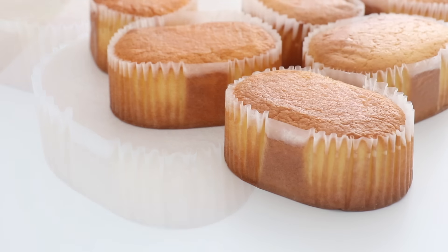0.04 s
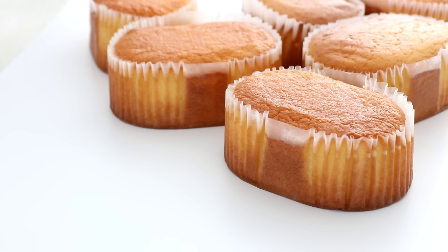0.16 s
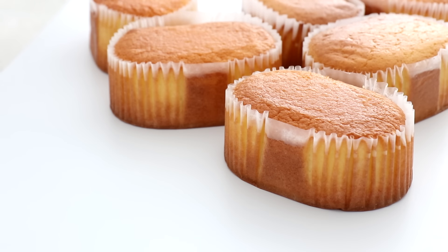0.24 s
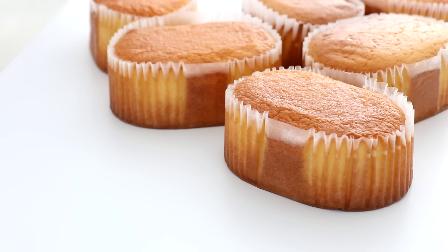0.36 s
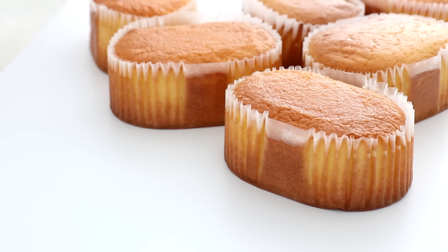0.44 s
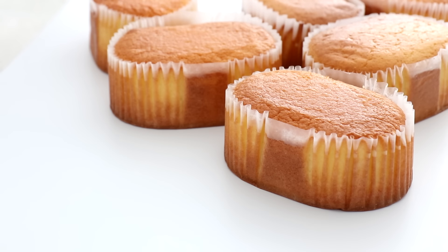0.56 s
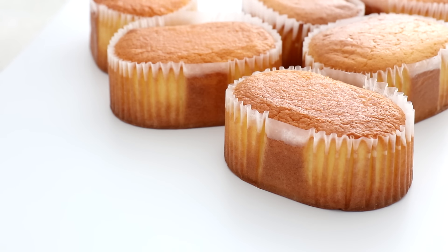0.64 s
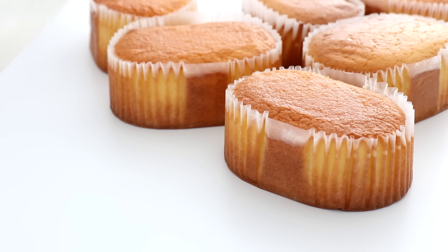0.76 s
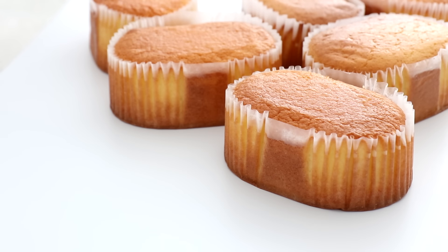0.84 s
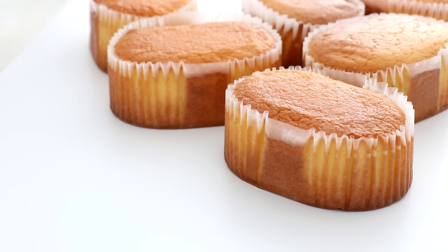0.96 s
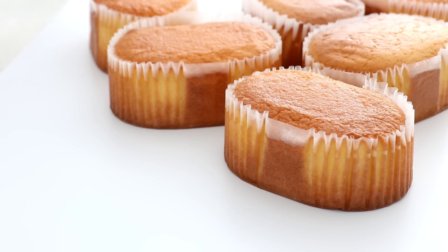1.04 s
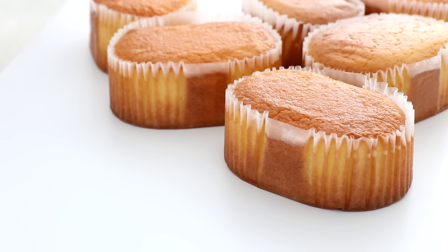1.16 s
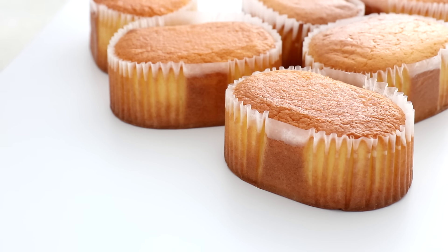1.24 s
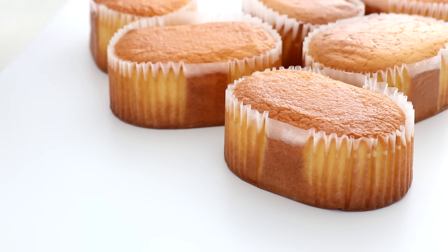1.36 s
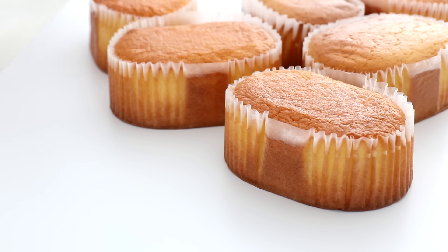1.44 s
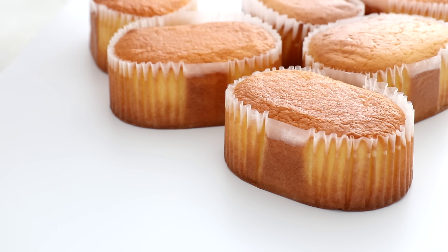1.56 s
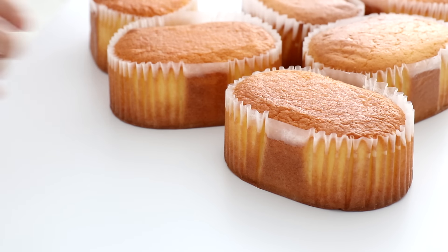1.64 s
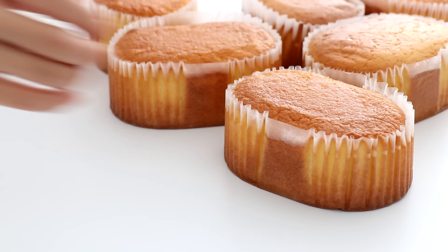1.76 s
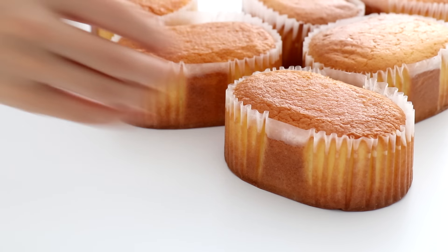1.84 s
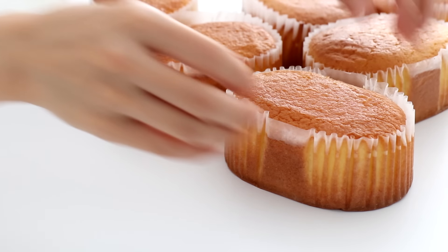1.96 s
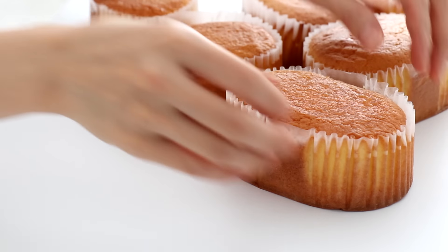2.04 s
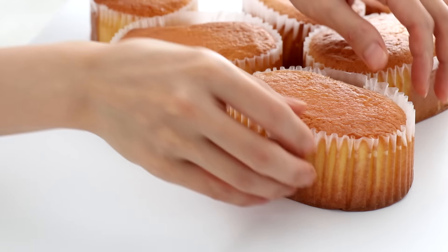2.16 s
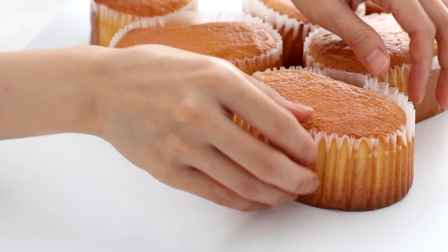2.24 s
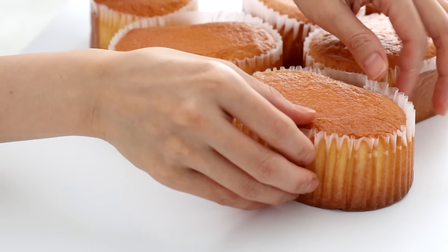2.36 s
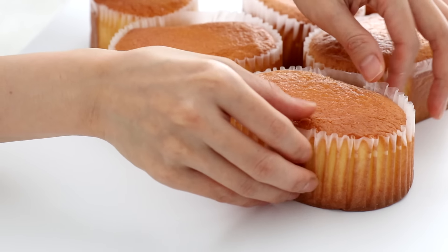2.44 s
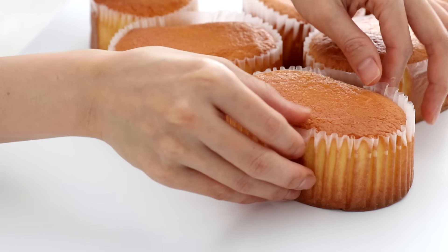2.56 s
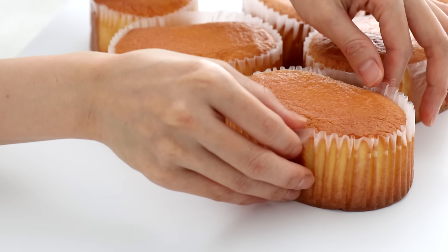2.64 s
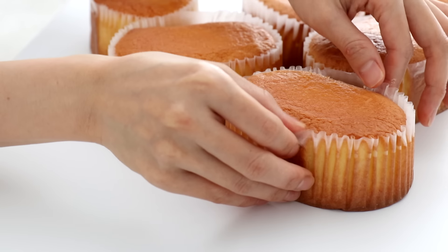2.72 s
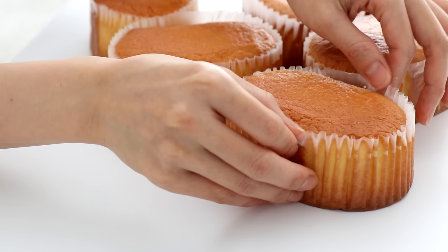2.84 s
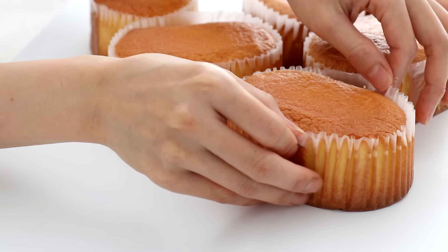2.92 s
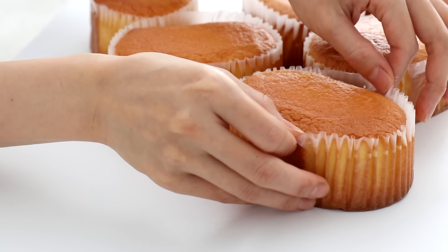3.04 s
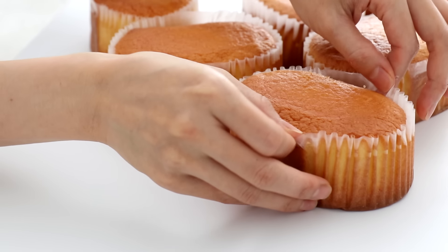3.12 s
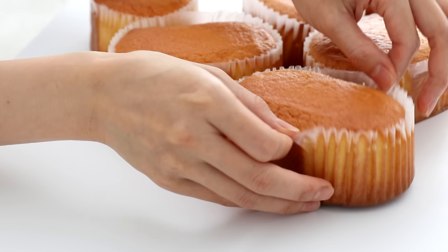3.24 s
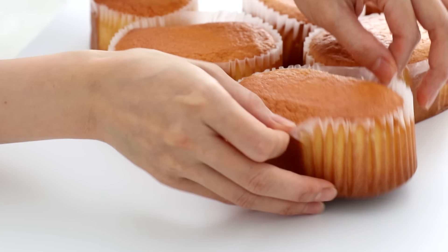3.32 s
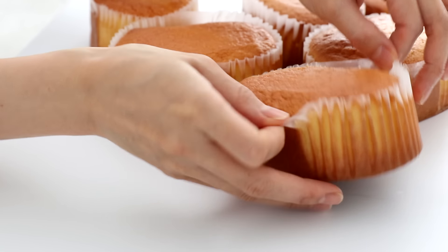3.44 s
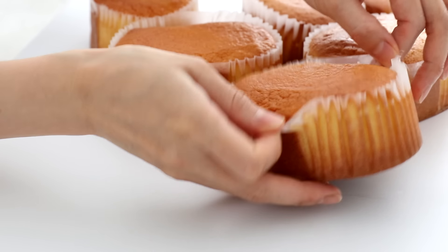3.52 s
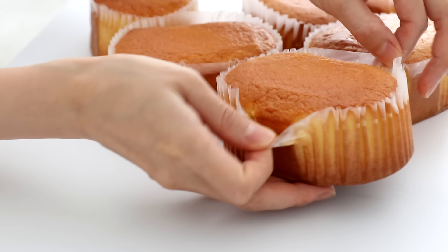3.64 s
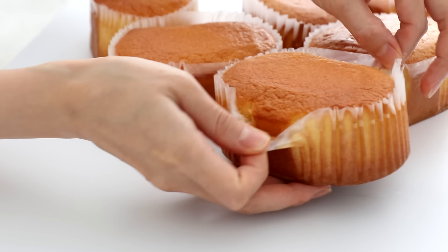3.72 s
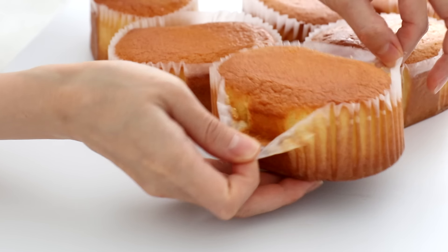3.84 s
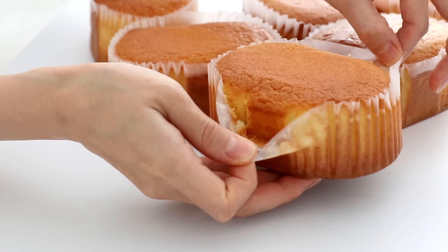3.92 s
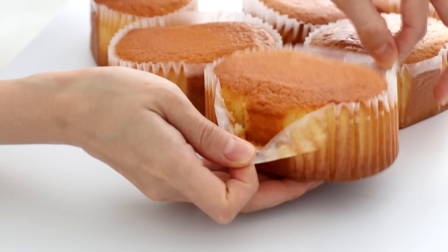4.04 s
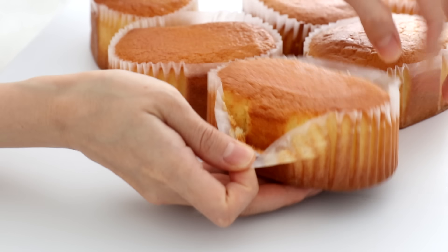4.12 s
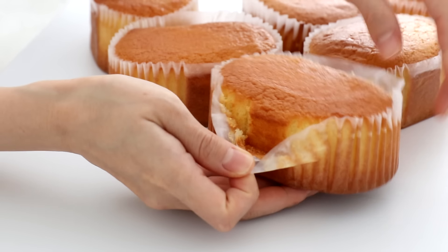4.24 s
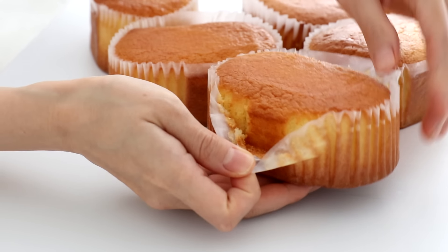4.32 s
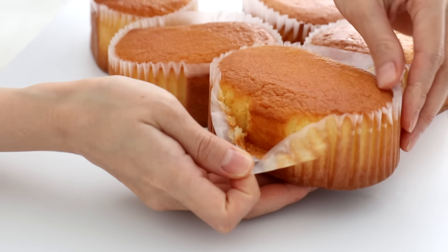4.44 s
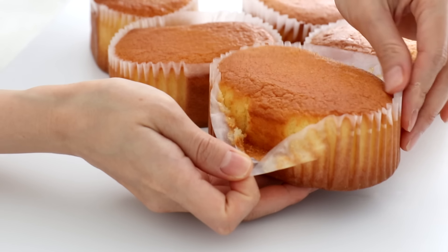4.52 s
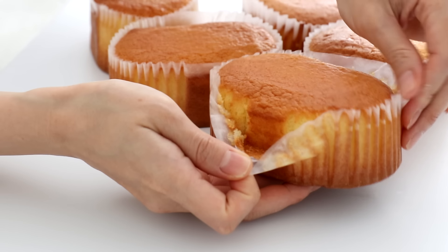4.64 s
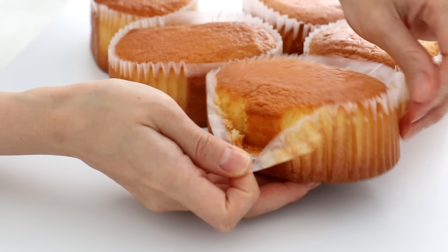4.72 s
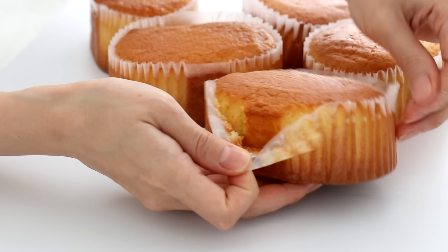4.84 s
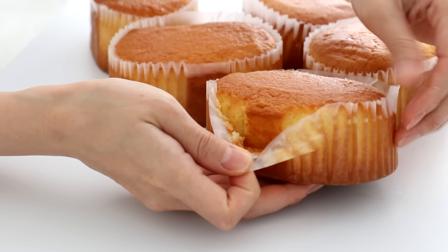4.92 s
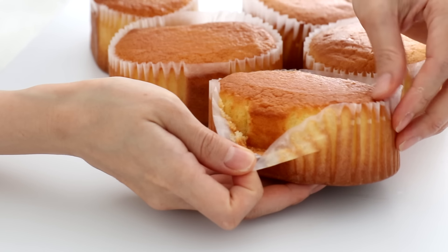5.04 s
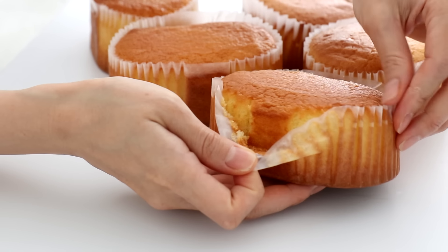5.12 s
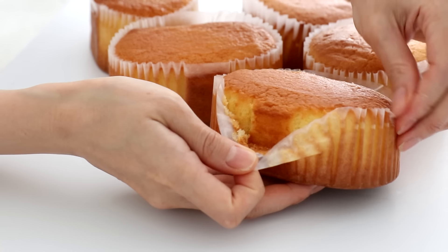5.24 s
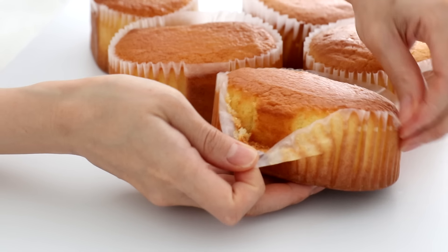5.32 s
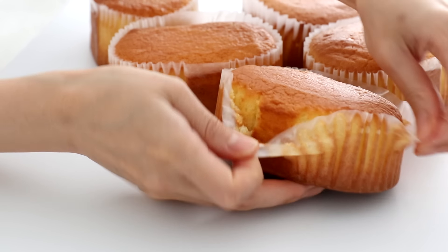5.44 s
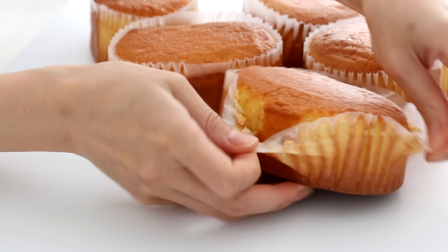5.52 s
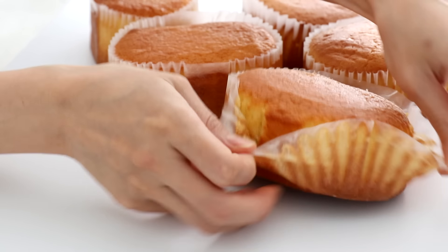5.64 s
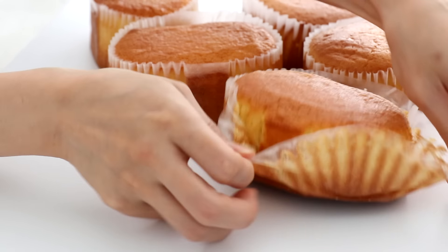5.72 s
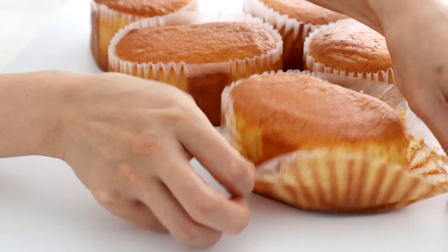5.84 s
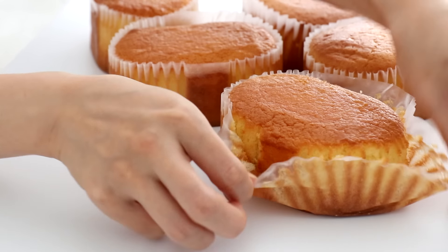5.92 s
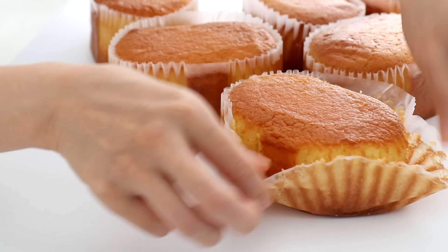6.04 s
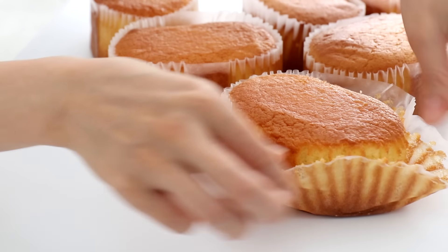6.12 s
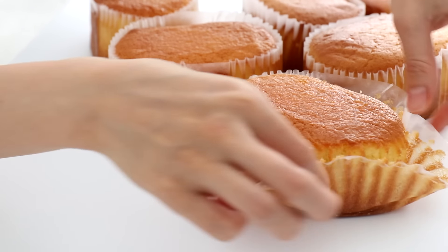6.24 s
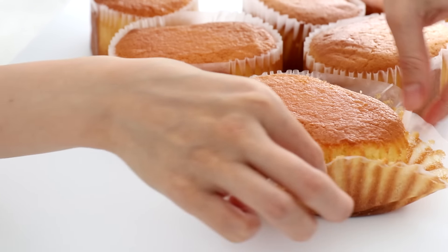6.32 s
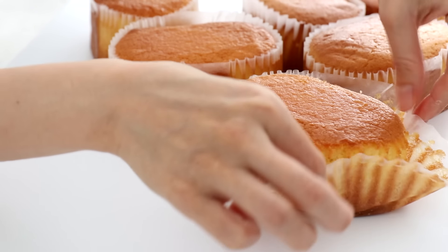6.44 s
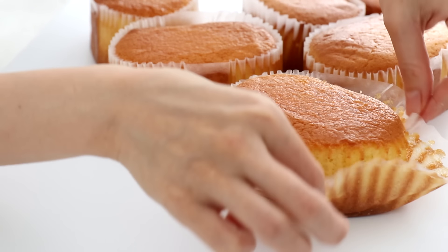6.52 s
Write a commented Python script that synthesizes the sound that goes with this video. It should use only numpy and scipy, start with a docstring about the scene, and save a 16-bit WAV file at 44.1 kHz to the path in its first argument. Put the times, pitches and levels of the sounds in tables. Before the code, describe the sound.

In a quiet room, thin baking paper crinkles and rips away from soft cake in dry, crisp bursts, with a soft early bump and low appliance hum.

```python
"""Peeling a paper liner off a small cake

Two hands peel a pleated paper liner off a small cake on a table, close to the microphone in a quiet room.
Pleats buckle with dry snaps (struck, ringing facets); short pulls tear paper from crumb with a fine
crackle (many tiny clicks), among short pitched rubs and lingering rings (brief runs of ringing clicks).
The cake bumps softly on the table (fading low tones). An appliance hums with a slow beat and rushes
(tones and resonant noise) over the room's air (coloured noise)."""
import sys
import numpy as np
from scipy import signal
from scipy.io import wavfile

SR = 44100
rng = np.random.default_rng(int(sys.argv[2]) if len(sys.argv) > 2 else 0)


def put_to_file(sound):
    """Save the sound as 16-bit audio at rate SR, in the file named by the first command-line argument."""
    columns = np.atleast_2d(sound).T  # one column per channel
    safe = np.clip(columns, -1, 1)
    whole_steps = np.round(safe * 32767)
    wavfile.write(sys.argv[1], SR, whole_steps.astype(np.int16))


N = 290178
TIME = np.arange(N) / SR   # seconds

# Hum before its overall gain and waver: [t/s, level/dB]
HUM_LEVEL = [(0.0, -53.5), (1.5, -55.5), (2.1, -65), (3.3, -55), (4.1, -55.5), (4.8, -52), (6.58, -52)]
# Shaft tone, an octave below the hum, before its waver: [t/s, level/dB]
SHAFT_LEVEL = [(0.0, -54), (0.4, -78), (0.88, -49), (1.6, -53.5), (2.6, -56.5), (3.1, -66), (4.0, -66),
               (4.58, -48.5), (4.9, -67), (6.35, -52.5), (6.58, -55)]
# Resonances in the appliance's rush: [f/Hz, width/Hz, level/dB, left over right/dB]
RUSH_RESONANCES = [(193.7, 20.3, -58, -2), (313.2, 25, -63, -4), (539, 86, -68, -2),
                   (723, 16.6, -68.5, -10), (1352, 122, -63, -11), (2648, 27, -83.5, 5)]
HUM_HZ = 115.75
# The hum beats: period, time of one dip, size of the second tone beside the first
BEAT_S, BEAT_DIP_S, BEAT_SHARE = 1.653, 0.62, 0.35

# Colour of the room air, relative: [f/Hz, level per Hz/dB]
AIR_COLOUR = [(20, -21), (32, -3.5), (47, 3.5), (80, -2.5), (150, -7), (200, -1.5), (260, -7), (370, -8.5),
              (455, -20.5), (600, -18.5), (1100, -19.5), (1450, -24), (1800, -28.5), (4500, -34.5),
              (15500, -40.5)]
# How alike left and right are in the room air and the rush: [f/Hz, correlation]
CHANNEL_LIKENESS = [(30, 1), (60, 0), (110, 0.35), (210, 0.74), (380, 0.38), (700, 0.089), (1400, 0.051),
                    (2600, 0.44), (15000, 0)]

# Ranges in which paper sounds: whole pleats (body), facets (crack), fibres (tick): [low f/Hz, high f/Hz]
PAPER_RANGES = [(650, 2510), (2500, 6300), (7800, 14900)]
# Relative colour of the crackle within those ranges: [f/Hz, level/dB]
CRACKLE_COLOUR = [(500, -6), (900, -1), (1400, -0.5), (2000, 1.5), (2600, -8), (3600, -0.5), (5000, -2),
                  (6800, -13), (9500, 0), (12500, -14), (16000, 9)]
# Pulls and rubs of the fingers, before the range colour below:
# [t/s at full strength, hold/s, level/dB in the crack range, brightness/dB per range upwards]
PULLS = [(2.372, 0.012, -53, -6), (2.475, .032, -54, 1), (2.681, 0.029, -54.5, -4),
         (2.809, 0.049, -63.5, -2.5), (2.893, 0.067, -64, 3), (3.076, 0.08, -72.5, 6),
         (3.253, .012, -71, -1), (3.332, 0.027, -71, -5), (3.405, 0.27, -65, -0.5),
         (3.64, 0.069, -54, -1.5), (3.717, .045, -52.5, 0), (3.833, 0.091, -57, -3),
         (3.929, 0.011, -49, -1), (4.005, 0.016, -52.5, 3), (4.135, .02, -48.5, 3.5), (4.61, 0.064, -69, 5),
         (4.688, 0.056, -50.5, 5.5), (4.785, 0.0097, -47, 3), (4.947, 0.031, -71, 9),
         (5.178, 0.028, -58, 8), (5.302, 0.025, -55.5, 3.5), (5.506, 0.1, -57.5, 0.5),
         (5.622, 0.076, -54, -2.5), (5.719, 0.1, -62.5, -5), (5.766, .02, -57, -2),
         (5.794, 0.019, -47, 0.5), (5.939, 0.014, -56.5, -2.5), (6.012, 0.081, -61, -1.5),
         (6.157, .2, -70, -1), (6.319, 0.016, -61.5, 3.5), (6.392, 0.023, -47.5, 0.5),
         (6.538, 0.016, -53.5, 4)]
# Colour of a pull, one value for each of body, crack and tick: [level/dB]
PULL_COLOUR = [-1.5, -1, -4.5]
PULL_ATTACK_S, PULL_RELEASE_DB_PER_S = 0.0079, 253   # quick to take hold, then the paper settles
REACH_S, REACH_WIDTH_S, REACH_DB = 1.98, 0.21, -70.5   # faint swish as the hands reach in, before colour

# Pleats that buckle loudly:
# [t/s, facet ring f/Hz, level/dB in its own range, purity/dB lost per range away from the ring]
SNAPS = [(2.367, 1220, -35.5, 10), (2.38, 1500, -33.5, 1), (2.5501, 920, -44.5, 6),
         (2.6736, 11330, -41.5, 2), (2.6845, 4780, -41, 13), (2.7325, 11100, -44, 3),
         (2.7551, 3960, -47, 18), (2.815, 2030, -34.5, 6.5), (2.8792, 4740, -44, 2.5),
         (2.905, 10510, -44.5, 1.5), (3.0408, 1510, -48, 11), (3.0767, 8300, -49, 1),
         (3.2483, 10900, -49.5, 11), (3.3261, 10900, -41.5, 0.5), (3.407, 3300, -42.5, 12.5),
         (3.4768, 3010, -45.5, 21), (3.612, 4950, -46.5, 9), (3.621, 1650, -45, 13),
         (3.6387, 1557, -42, 18), (3.6506, 2110, -39, 10), (3.6615, 4600, -35.5, 3.5),
         (3.6665, 5040, -43, 5), (3.6796, 2750, -36.5, 23), (3.699, 3920, -41, 13), (3.7202, 3920, -33, 6),
         (3.7222, 11900, -31, 2.5), (3.7238, 3730, -35, 21), (3.7452, 2280, -37.5, 12),
         (3.762, 4570, -46, 13), (3.7833, 3580, -41.5, 18), (3.83, 4350, -40, 12), (3.8332, 3400, -41, 13),
         (3.8474, 1205, -44.5, 9), (3.8973, 4610, -45, 13), (3.9166, 5200, -36, 12), (3.9386, 4610, -38, 8),
         (3.947, 1500, -45, 11), (3.9703, 3830, -44, 4), (4.0, 3330, -31, 6.5), (4.1001, 1520, -42.5, 8),
         (4.1304, 4960, -39, 3.5), (4.681, 5050, -49, 14), (4.6932, 10840, -39, 3),
         (4.7192, 5130, -33.5, 14), (4.7253, 4150, -35, 2), (4.7854, 4740, -34.5, 9),
         (5.2155, 11200, -41.5, 3), (5.32, 2420, -51.5, -3), (5.3555, 11150, -45.5, 5),
         (5.4293, 11360, -45, 3.5), (5.4675, 890, -49, 18), (5.48, 11700, -42, 5), (5.4927, 1680, -46.5, 9),
         (5.5056, 13600, -36.5, 24), (5.5365, 2970, -48, 10), (5.63, 9420, -35.5, 5), (5.656, 3980, -46, 0),
         (5.7129, 9600, -39.5, 5), (5.7564, 11350, -36.5, 4.5), (5.796, 4970, -39, 9),
         (5.8115, 4230, -39, 15), (5.829, 4260, -40, 15), (6.0162, 5730, -51, 1), (6.0276, 5780, -53, -1),
         (6.085, 1900, -50, 5), (6.1648, 3300, -40.5, 6), (6.4052, 3380, -41, 3), (6.4942, 2080, -50, 8),
         (6.5049, 1850, -40, 9), (6.517, 1880, -42, 6), (6.5376, 1940, -33.5, 10)]
# Extra gain of body, crack and tick when the ring lies in another range: [gain/dB]
FLIP_COLOUR = [-8, -1.5, 3.5]
SNAP_PAN_DB, SNAP_SCATTER_DB = -0.8, 0.8   # left over right for the pleats, and its spread
# Lesser pleats in a pull: average gap, level above the pull, purity per range
SMALL_SNAP_GAP_S, SMALL_SNAP_OVER_DB, SMALL_SNAP_PURITY_DB = 0.031, 10, 18

# Cake and fingers on the table: [t/s, level/dB before the soft attack, f/Hz, time to fade 60 dB/s]
BUMPS = [(2.418, -38, 195, 0.11), (2.448, -37.5, 109.6, 0.2), (2.495, -34.5, 112, 0.15),
         (2.526, -37, 66, 0.1), (2.812, -38, 182, 0.096), (5.537, -61, 198, 0.069)]
# Short pitched rubs and lingering rings of paper, cake or table:
# [middle t/s, time from middle to 1/e^2/s, ring f/Hz, level/dB]
RUBS_AND_RINGS = [(2.838, .025, 2080, -56), (3.418, 0.024, 4400, -58), (3.913, 0.018, 5100, -66),
                  (4.785, 0.071, 1960, -55.5), (5.48, 0.029, 1700, -61), (5.519, 0.016, 2260, -62),
                  (5.55, 0.017, 2930, -62), (5.674, 0.053, 830, -54.5), (5.81, 0.021, 1070, -48),
                  (5.814, 0.03, 550, -57)]

# How long reflections last: [f/Hz, time to fade 60 dB/s]
ROOM_FADE = [(300, 0.15), (1500, 0.2), (4000, 0.48), (9000, 0.21), (16000, 0.18)]
# Relative colour of the reflections: [f/Hz, level/dB]
ROOM_COLOUR = [(200, 0), (1200, -6.5), (4000, -10), (9000, -3), (16000, -8)]
CUTOFF_HZ = 15900


def from_db(db):
    """Turn decibels into a gain."""
    return 10 ** (np.asarray(db) / 20)


def rms_one(x):
    """Scale a sound to an average strength (RMS) of 1."""
    return x / np.sqrt(np.mean(x ** 2) + 1e-20)


def in_time(rows):
    """Read each column of a curve table at every sample."""
    s, *columns = np.transpose(rows)
    return [np.interp(TIME, s, c) for c in columns]


def at_hz(points, hz):
    """Read a spectrum table on a log-frequency axis."""
    table_hz, values = np.transpose(points)
    return np.interp(np.log(hz), np.log(table_hz), values)


def panned(left_db):
    """Left and right gains of constant power."""
    return rms_one(from_db([[left_db / 2], [-left_db / 2]]))


def band(x, low, high, order=2):
    """Keep one band of pitches (Butterworth band-pass)."""
    sos = signal.butter(order, [low, min(high, .45 * SR)], "band", fs=SR, output="sos")
    return signal.sosfilt(sos, x + 1e-18)


def resonance(x, hz, width_hz):
    """Ring at one pitch (two poles), with a gain of about 1 at the peak."""
    r = np.exp(-np.pi * width_hz / SR)
    top = np.array([1, 0, -1]) * (1 - r * r) / 2
    bottom = [1, -2 * r * np.cos(2 * np.pi * hz / SR), r * r]
    return signal.lfilter(top, bottom, x + 1e-18)


def drift(rate):
    """Random wandering with an RMS of 1: straight lines between `rate` random points per second."""
    knots = rng.standard_normal(4000)
    return rms_one(np.interp(TIME * rate, np.arange(len(knots)), knots))


def noise_bands(size, low_hz, count):
    """Pairs of unrelated noises in adjoining bands: (centre Hz, noise)."""
    edges = np.geomspace(low_hz, 17000, count + 1)
    white = rng.standard_normal((2, 2, size))   # neighbouring bands take turns between two noises
    bands = []
    for k, (low, high) in enumerate(zip(edges, edges[1:])):
        bands.append((np.sqrt(low * high), band(white[k % 2], low, high, order=3)))
    return bands


def diffuse(pair, hz):
    """Mix two unrelated noises into left and right, as alike as the likeness table says at this pitch."""
    alike = np.clip(at_hz(CHANNEL_LIKENESS, hz), -1, 1)
    return np.sqrt(1 + alike) * pair[0] + np.sqrt(1 - alike) * pair[1] * [[1], [-1]]


def range_of(hz):
    """Which of the paper's ranges a pitch belongs to: 0 body, 1 crack, 2 tick."""
    return sum(hz > high for low, high in PAPER_RANGES[:2])


def appliance(hum_gain_db=3.0, hum_lag=1.72, shaft_lag=1.0, waver_db=0.5):
    """A motor hums at its shaft rate and the octave, a close second tone beats, the fan rushes in resonances."""
    phase = 2 * np.pi * np.cumsum(HUM_HZ + .5 * drift(5.4)) / SR   # pitch wanders by about 0.5 Hz
    right = np.array([[0], [1]])   # the lags, in radians, put the right channel out of step
    hum_phase = phase - hum_lag * right
    beat = 2 * np.pi * (TIME - BEAT_DIP_S) / BEAT_S
    tones = np.sin(hum_phase) - BEAT_SHARE * np.sin(hum_phase + beat)
    hum_level = in_time(HUM_LEVEL)[0] + hum_gain_db + waver_db * drift(17)
    hum = from_db(hum_level) * tones * panned(6.9)
    shaft_level = in_time(SHAFT_LEVEL)[0] + waver_db * drift(4.6)
    shaft = from_db(shaft_level) * np.sin(phase / 2 - shaft_lag * right) * panned(6.8)
    rush = 0
    for hz, width_hz, db, left_db in RUSH_RESONANCES:
        noise = rng.standard_normal((2, N))
        for _ in range(2):   # two passes narrow the peak, so each is made wider
            noise = resonance(noise, hz, 1.33 * width_hz)
        rush = rush + from_db(db) * rms_one(diffuse(noise, hz)) * panned(left_db)
    return np.sqrt(2) * (hum + shaft) + rush   # a sine times root 2 has an RMS of 1


def air(level_db=-50.5):
    """Steady low rumble of the room under a faint hiss, built from bands of noise."""
    bands = noise_bands(N, 18, count=26)
    mix = sum(from_db(at_hz(AIR_COLOUR, hz)) * diffuse(noise, hz) for hz, noise in bands)
    return from_db(level_db) * rms_one(mix)


def pull_levels():
    """Level of the rubbing in each range (dB): the reach, then attack, hold and release for every pull."""
    t = TIME[::32]   # a coarse clock is enough for slow levels
    steps = np.array([[-1], [0], [1]])   # body, crack, tick
    reach = np.exp(-.5 * ((t - REACH_S) / REACH_WIDTH_S) ** 2)
    power = (from_db(REACH_DB) * reach) ** 2
    for start, hold, db, brightness in PULLS:
        attack = np.clip(1 + (t - start) / PULL_ATTACK_S, 0, 1)
        release_db = PULL_RELEASE_DB_PER_S * np.maximum(t - start - hold, 0)
        power = power + (attack * from_db(db + brightness * steps - release_db)) ** 2
    levels = 10 * np.log10(power + 1e-20)
    return [np.interp(TIME, t, level) + colour_db for level, colour_db in zip(levels, PULL_COLOUR)]


def crackle(low, high, born, sizes, grain_q=5.0, count=8):
    """Every breaking bond strikes all small patches of the paper, each with a strength of its own."""
    out = 0
    for hz in np.geomspace(low, high, 2 * count + 1)[1::2]:
        shared, apart = rng.standard_normal((2, len(born)))
        clicks = np.zeros((2, N))
        clicks[:, born] = sizes * (shared + 0.067 * apart * [[1], [-1]])   # nearly the same left and right
        out = out + from_db(at_hz(CRACKLE_COLOUR, hz)) * resonance(clicks, hz, hz / grain_q)
    return rms_one(band(out, low * 0.87, high * 1.27))


def peeling(swish_below_db=-69):
    """Firm pulling breaks tiny bonds, most of them weak, and crackles; light contact mainly swishes."""
    bonds_per_s, spread_db, rub_share = 950, 4.8, .14   # some smooth rub stays even in firm pulls
    born = np.flatnonzero(rng.random(N) < bonds_per_s / SR)
    sizes = from_db(spread_db * np.minimum(rng.exponential(1, len(born)), 3))
    out = 0
    for level_db, (low, high) in zip(pull_levels(), PAPER_RANGES):
        lightness = np.clip((swish_below_db - level_db) / 6 + .5, 0, 1)
        smooth = np.clip(rub_share + lightness, 0, 1)
        noise = rng.standard_normal(N) + .5 * rng.standard_normal((2, N))
        rub = rms_one(band(noise, low, high, order=3))
        grains = crackle(low, high, born, sizes)
        out = out + from_db(level_db) * (np.sqrt(smooth) * rub + np.sqrt(1 - smooth) * grains)
    return out * panned(-0.63)


def room(x, wet_db=-6.0, size=20000):
    """Diffuse reflections, different at each microphone, each band of pitches fading at its own pace."""
    t = np.arange(size) / SR
    tail = 0
    for hz, noise in noise_bands(size, 150, count=10):
        tail = tail + noise * from_db(at_hz(ROOM_COLOUR, hz) - 60 * t / at_hz(ROOM_FADE, hz))
    onset = np.interp(t, [.0007, .002], [0, 1])   # nothing before 0.7 ms
    tail = rms_one(tail * onset) / np.sqrt(size)
    return from_db(wet_db) * signal.fftconvolve(x, tail, axes=1)[:, :N]


def snaps(rows, crumple_s=0.00061, ring_gain=4.8, overtone_gain=1.8, ring_q=7.2, size=600, count=256):
    """A pleat flips: one impulse and a brief crumple of fibres set a facet ringing for a few cycles."""
    out, t = np.zeros((2, N + size)), np.arange(size) / SR
    level_span, crumple = .002 * SR, .42   # a snap has the energy of its level held for 2 ms
    usual_hz = [1300, 4700, 11000]   # where a typical pleat rings in each range
    unlike = [.12, .25, .7]   # the shorter the waves, the more differently the two microphones see the crumple
    crumples = rng.standard_normal((count, 3, size))
    detunes = rng.uniform(.9, 1.1, (count, 3))
    places_db = SNAP_PAN_DB + SNAP_SCATTER_DB * rng.standard_normal(count)
    for (s, hz, level_db, purity_db), fibres, detune, left_db in zip(rows, crumples, detunes, places_db):
        start = min(int(s * SR), N)
        for k, ((low, high), apart, other_hz) in enumerate(zip(PAPER_RANGES, unlike, usual_hz * detune)):
            flip = crumple * (fibres[0] + apart * fibres[1:]) * np.exp(-t / crumple_s)
            flip[:, 0] += np.sign(fibres[0, 0])   # the impulse
            # the facet's main mode rules its own range; broader, weaker modes colour the others
            away = abs(k - range_of(hz))
            if away == 0:
                db = level_db
                ring = ring_gain * resonance(flip, hz, hz / ring_q)
            else:
                db = level_db - purity_db * away + FLIP_COLOUR[k]
                ring = overtone_gain * resonance(flip, other_hz, 2 * other_hz / ring_q)
            facet = rms_one(band(flip + ring, low, high, order=3)) * np.sqrt(level_span / size)
            out[:, start:start + size] += from_db(db) * facet * panned(left_db)
    return out[:, :N]


def small_snaps(count=8):
    """Lesser pleats give way at random while a pull lasts, louder in a firm pull: rows like those of SNAPS."""
    rows = []
    for (start, hold, db, brightness), draws in zip(PULLS, rng.random((len(PULLS), count, 2))):
        times = start + np.cumsum(2 * SMALL_SNAP_GAP_S * draws[:, 0])
        pitches = 1200 * 10 ** draws[:, 1]   # 1200 to 12000 Hz
        for s, hz in zip(times, pitches):
            if s < start + hold:
                level_db = db + SMALL_SNAP_OVER_DB + brightness * (range_of(hz) - 1)
                rows.append((s, hz, level_db, SMALL_SNAP_PURITY_DB))
    return rows


def bumps(attack_s=0.007):
    """Soft contacts swell and ring the table top briefly."""
    out = np.zeros(N)
    for s, db, hz, t60 in BUMPS:
        age = np.maximum(TIME - s, 0)
        swell = 1 - np.exp(-age / attack_s)
        out += from_db(db - 60 * age / t60) * swell * np.sin(2 * np.pi * hz * age)
    return out


def rubs_and_rings(clicks_per_s=700, ring_q=12):
    """A short run of random clicks swells and fades, each ringing at one pitch: a rub, squeak or lingering ring."""
    out = np.zeros(N)
    for s, length, hz, db in RUBS_AND_RINGS:
        clicks = rng.random(N) < clicks_per_s / SR
        swell = np.exp(-2 * ((TIME - s) / length) ** 2)
        out += from_db(db) * swell * rms_one(resonance(clicks, hz, hz / ring_q))
    return out


def scene():
    """The paper, rubs and rings with their reflections, over the bumps and the room's background."""
    close_sounds = snaps(SNAPS + small_snaps()) + peeling() + rubs_and_rings()
    return close_sounds + room(close_sounds) + bumps() + appliance() + air()


def record(dry):
    """Cut the top steeply with an elliptic low-pass filter."""
    return signal.sosfilt(signal.ellip(10, .2, 70, CUTOFF_HZ, fs=SR, output="sos"), dry)


dry = scene()
out = record(dry)
put_to_file(out)
```